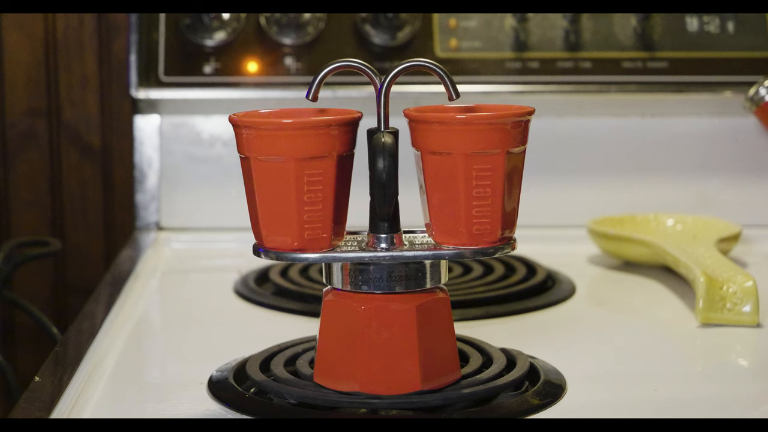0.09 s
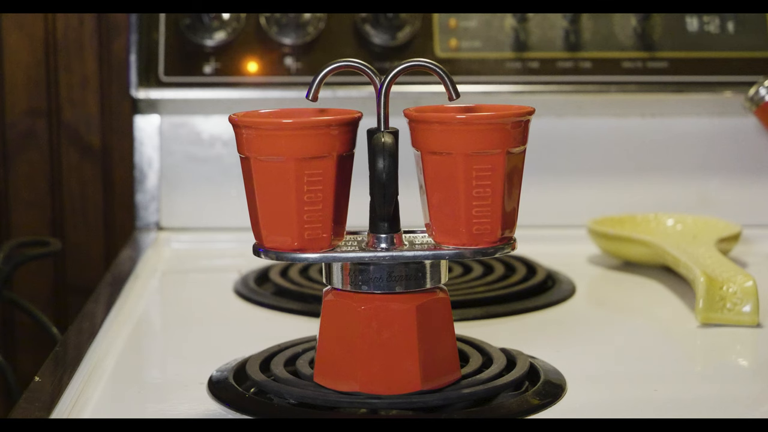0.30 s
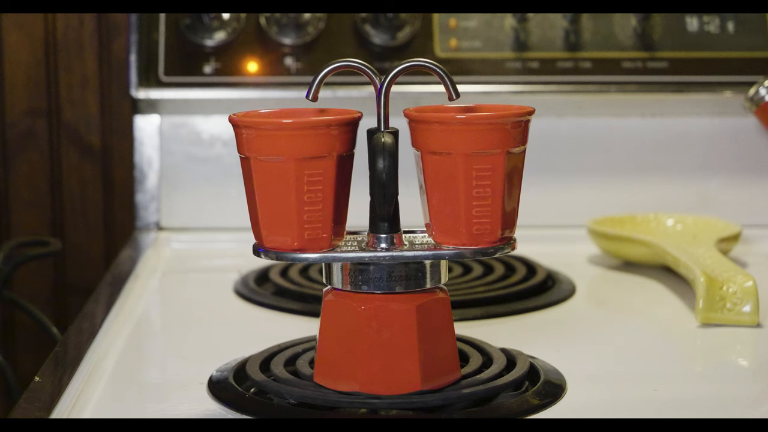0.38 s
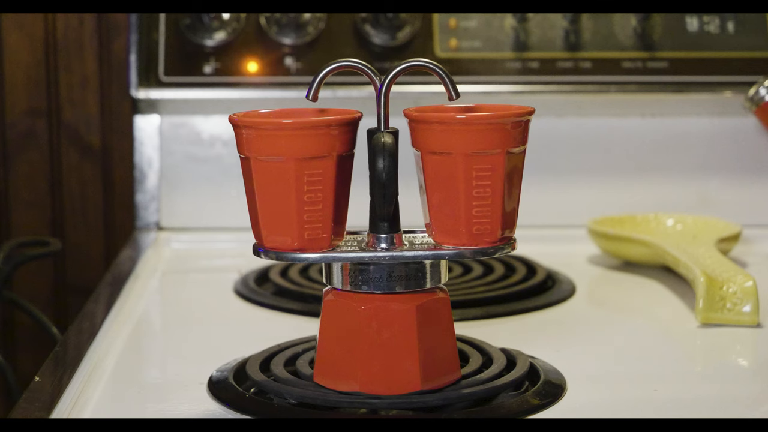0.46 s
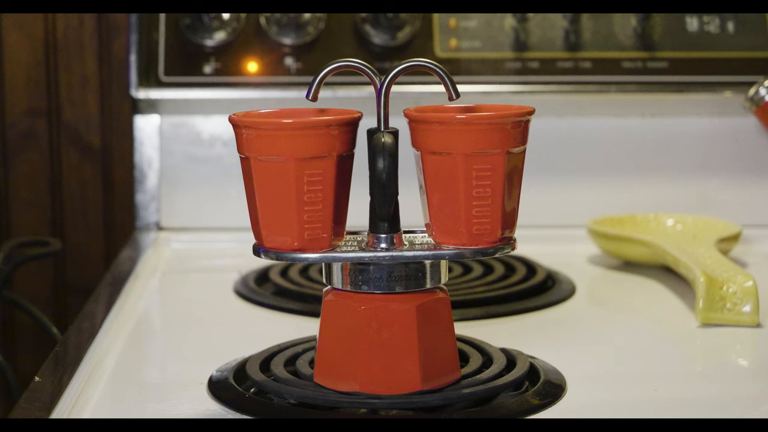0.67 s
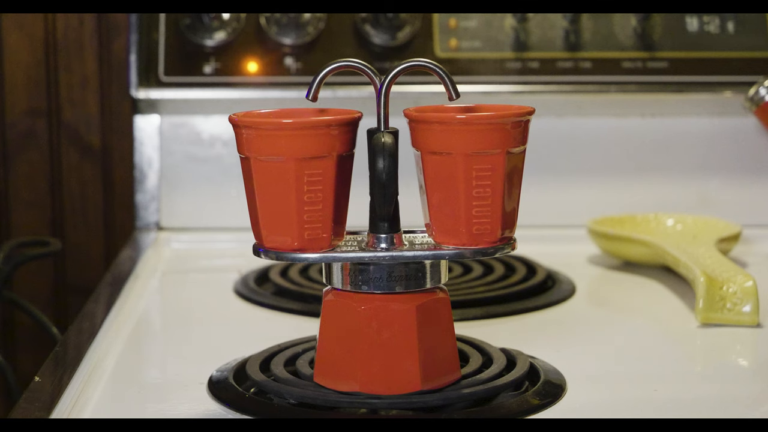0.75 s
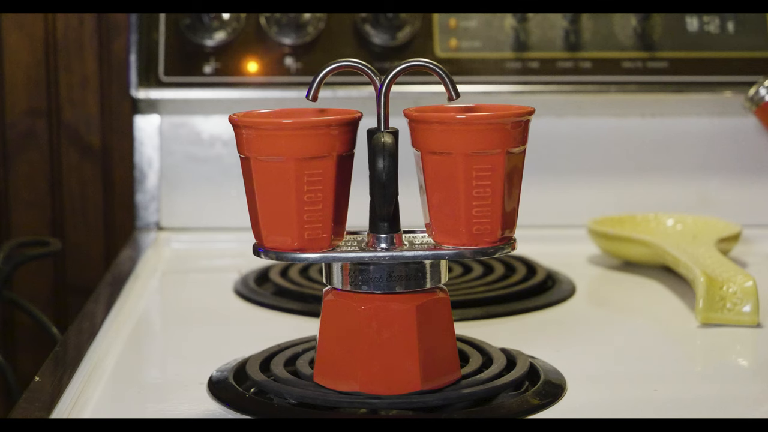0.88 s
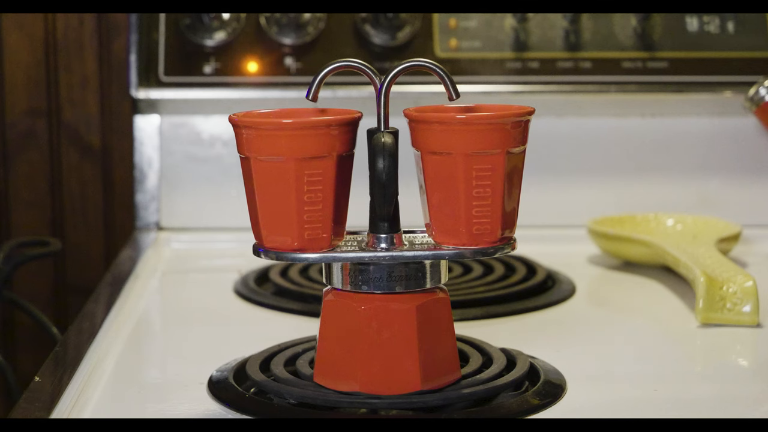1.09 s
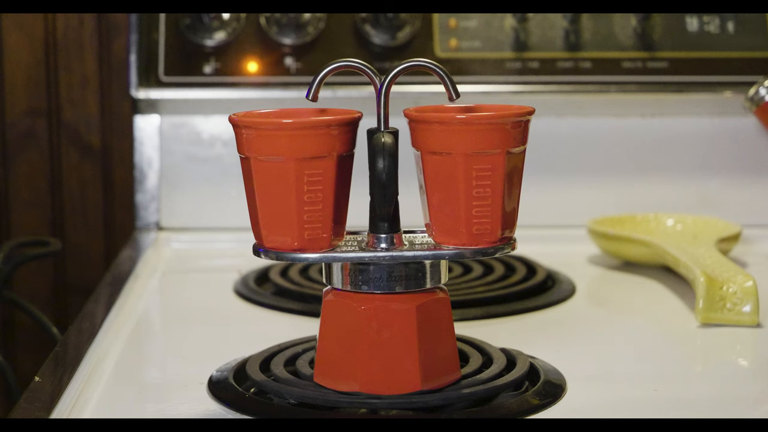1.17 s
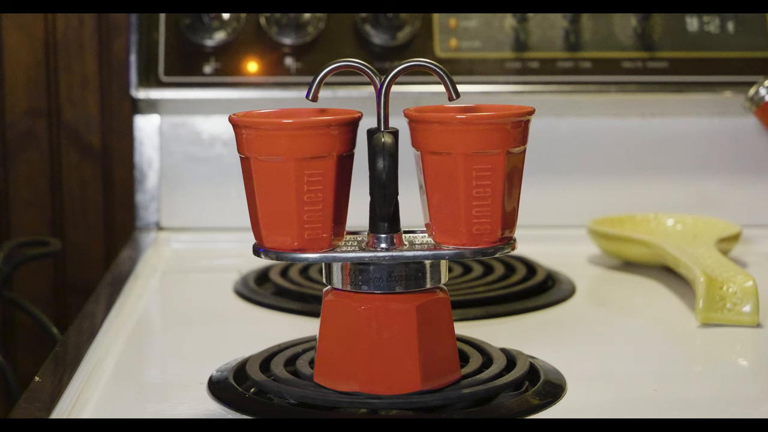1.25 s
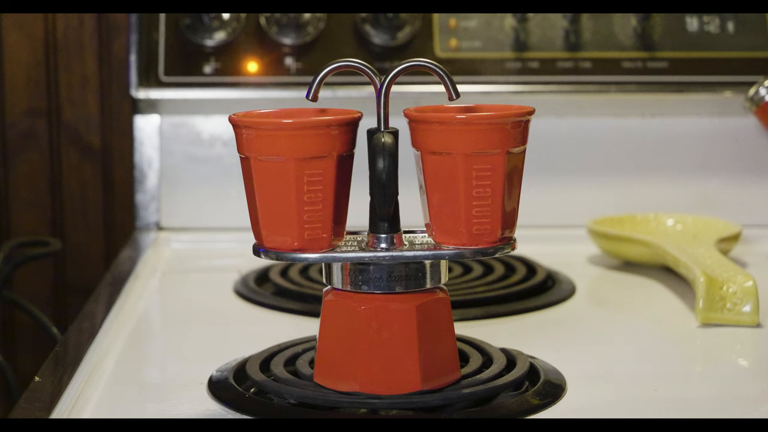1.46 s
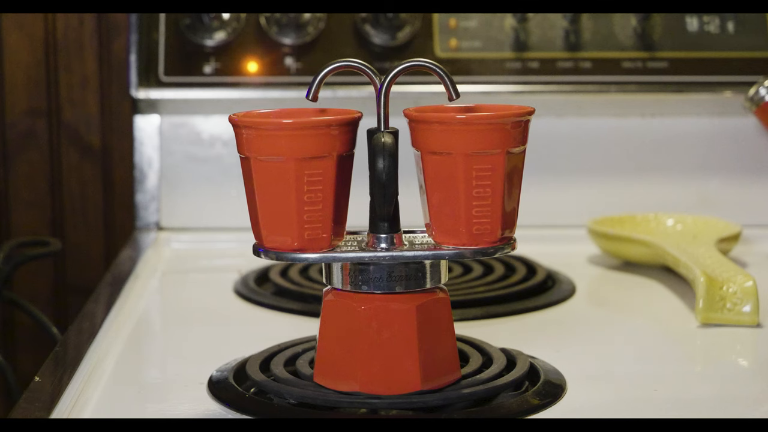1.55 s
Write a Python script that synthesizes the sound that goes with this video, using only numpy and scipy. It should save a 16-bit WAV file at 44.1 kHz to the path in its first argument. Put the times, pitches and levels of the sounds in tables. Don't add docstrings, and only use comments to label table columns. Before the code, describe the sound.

Coffee spits from thin metal spouts into cups, heard very close with a short, tight cup and kitchen echo; irregular bubbly pops build to fierce, slightly overloaded crackling, then thin out over faint hiss and hum.

```python
import sys
import numpy as np
from scipy import signal
from scipy.fft import rfft, irfft
from scipy.io import wavfile
from scipy.ndimage import uniform_filter1d

SR = 44100
rng = np.random.default_rng(int(sys.argv[2]) if len(sys.argv) > 2 else 0)


def rack_gain(trim_db):
    fader = np.asarray(trim_db, float)
    return 10 ** (fader / 20)


def file_out(sig):
    cols = np.atleast_2d(sig).T
    lim = np.clip(cols, -1, 1)
    pcm = np.round(lim * 32767).astype(np.int16)
    wavfile.write(sys.argv[1], SR, pcm)


N = 68355
# (frequency [Hz], width [Hz], level [dB])
SPOUT = [(1046, 443, 11), (2250, 1550, 2.5), (4727, 1200, -11.5), (6080, 2630, -9), (10705, 3200, -24)]
COLOUR_DB = 4
CROWD_PER_S = 1600
AFTER_S, AFTER_DB = 0.003, -6.5


def evened(x):
    return x / np.sqrt(np.mean(x ** 2) + 1e-20)


def add(mix, s, sound):
    part = mix[max(round(s * SR), 0):][:len(sound)]
    part += sound[:len(part)]


def resonate(x, hz, width):
    pole = np.exp((2j * hz - width) * np.pi / SR)
    return 2 * signal.lfilter([1 - abs(pole)], [1, -pole], x).real


def ring(hz, cycles, phase):
    u = np.arange(1500) / SR * hz / cycles
    swell = (u * np.exp(1 - u)) ** 1.6
    return swell * np.cos(2 * np.pi * ((u - 1) * cycles + 0.12 * phase))


def hiss():
    # (frequency [Hz], level [dB per Hz])
    air_colour = [(40, -14), (100, 5), (276, 7), (640, -2.5), (2600, -55), (4000, -16), (12300, -24.5),
                  (16500, -25)]
    hiss_db, patch_db, flicker_db = -51, 3.5, 2.5
    a, b, patches = rng.standard_normal((N // 64 + 5, 129, 3)).T
    patches = evened(uniform_filter1d(uniform_filter1d(patches, 14, 0), 8, 1))
    flicker = evened(patches[30:].mean(0))
    level = patch_db * np.clip(patches, -2, 2) + flicker_db * flicker
    x = signal.istft((a + 1j * b) * rack_gain(level), nperseg=256, noverlap=192)[1][:N]
    f, db = np.transpose(air_colour)
    hz = np.fft.rfftfreq(N, 1 / SR)
    colour = rack_gain(np.interp(np.log(hz + 1), np.log(f + 1), db))
    return rack_gain(hiss_db) * evened(irfft(rfft(x) * colour, N))


def hum():
    return rack_gain(-58.5) * np.sin(2 * np.pi * 61 * np.arange(N) / SR)


def through_spout(clicks, colour):
    out = np.zeros(N)
    for k, (hz, width, db) in enumerate(SPOUT):
        once = resonate(clicks * colour[k], hz, 1.35 * width)
        out += (-1) ** k * rack_gain(db) * resonate(once, hz, 1.34 * width)
    return out


def crackle():
    # (start [s], length [s], level [dB])
    surge_times = [
        (0.593, 0.059, -36),
        (0.721, 0.023, -33),
        (0.792, 0.039, -34.5),
        (0.845, 0.022, -30.5),
        (0.894, 0.045, -26),
        (0.951, 0.022, -25),
        (1.036, 0.066, -28),
        (1.103, 0.056, -33),
        (1.248, 0.061, -39.5),
    ]
    edge_s, thinning, surge_spread_db = .004, .6, 3.0
    stray_per_s, stray_db, stray_spread_db = 300, -57, 3.5
    t, level = np.arange(N) / SR, np.zeros(N)
    for s, length, db in surge_times:
        shape = np.minimum((t - s) * 3, s + length - t) / edge_s
        level += rack_gain(db) * np.clip(shape, 0, 1)
    share = (level / level.max() + 1e-9) ** thinning
    draw = rng.random(N)
    size = np.minimum(rng.exponential(1, N), 3)
    sign = rng.choice([-1., 1.], N)
    dense = sign * rack_gain(surge_spread_db * size)
    stray = sign * rack_gain(stray_spread_db * size) * (draw > 1 - stray_per_s / SR)
    colour = rack_gain(COLOUR_DB * np.clip(rng.standard_normal((N, len(SPOUT))).T, -2, 2))
    crowd = dense * (draw < share * CROWD_PER_S / SR) * level / np.sqrt(share)
    full_crowd = dense * (draw < CROWD_PER_S / SR)
    surges = through_spout(crowd, colour) / np.std(through_spout(full_crowd, colour))
    return surges + rack_gain(stray_db) * evened(through_spout(stray, colour))


def pops():
    # (time [s], peak level [dB], spout ring [Hz])
    single_pops = [(0.0048, -24.5, 2540), (0.0118, -22.0, 2010), (0.028, -25, 2370), (0.0444, -27.5, 2540),
                   (0.0517, -39, 2430), (0.0629, -34, 2440), (0.1015, -21, 2530), (0.1651, -26, 2540),
                   (0.1827, -23.5, 2540), (0.2007, -11.5, 2420), (0.2456, -18.0, 2570),
                   (0.2916, -29.5, 2190), (0.3337, -35.5, 2570), (0.3509, -39, 2570), (0.4224, -12.0, 2320),
                   (0.442, -20.5, 2490), (0.4904, -37, 2200), (0.5021, -28.0, 2070), (0.5101, -21, 2097),
                   (0.5205, -42, 2250), (0.5237, -19, 2340), (0.5456, -30.0, 2000), (0.5673, -26, 2040),
                   (0.586, -21, 2140), (0.5986, -17, 2120), (0.6051, -20, 2150), (0.6171, -25, 2160),
                   (0.625, -18.5, 2500), (0.6368, -22, 2700), (0.6398, -19, 1960), (0.6507, -19.5, 2220),
                   (0.6745, -19.5, 2500), (0.6795, -19.5, 2630), (0.7215, -23, 2170), (0.7299, -12.5, 2450),
                   (0.7333, -17, 2240), (0.7414, -13, 2170), (0.7937, -24, 2130), (0.7967, -22.5, 2290),
                   (0.8018, -17.5, 2160), (0.8056, -14.5, 2470), (0.8087, -11, 2350), (0.8129, -18, 2200),
                   (0.8399, -22, 2410), (0.8493, -5.5, 2310), (0.8542, -8, 2580), (0.8579, -22, 2230),
                   (0.8621, -21, 2550), (0.8733, -15, 2370), (0.8836, -12.5, 2240), (0.8893, -17, 1850),
                   (0.8966, -22, 2250), (0.9016, -22.5, 2320), (0.9085, -1, 2220), (0.9164, -11, 2230),
                 (0.923, -15, 2430), (0.9278, -17, 2400), (0.9318, -15.5, 2380), (0.9386, -11, 2380),
                 (0.9537, -12, 2200), (0.9591, -10.5, 2220), (0.9647, -16.5, 2200), (0.9662, -12, 2450),
                 (0.982, -9.5, 2260), (1.0044, -10.5, 2270), (1.009, -15, 2250), (1.0326, -17.5, 2150),
                 (1.0403, -21, 2240), (1.0479, -13, 2160), (1.053, -17, 2220), (1.0559, -9, 2160),
                 (1.068, -9.5, 2270), (1.074, -13, 2270), (1.078, -7.5, 2220), (1.0817, -6.5, 2370),
                 (1.086, -14, 1880), (1.092, -15.5, 2090), (1.1056, -24, 2370), (1.109, -15.5, 2270),
                 (1.1193, -18.5, 2080), (1.1288, -24, 2370), (1.1412, -13.5, 2260), (1.1486, -12, 2300),
                 (1.1516, -17.5, 2220), (1.1715, -22, 2440), (1.2119, -27, 2120), (1.2241, -20, 1900),
                 (1.2419, -18, 2470), (1.2572, -20.0, 1940), (1.2669, -19.5, 2150), (1.2767, -18.5, 2500),
                 (1.3055, -36, 2190), (1.319, -28.5, 2060), (1.3574, -34, 2170), (1.3693, -23.5, 2420),
                 (1.3933, -27.5, 1820), (1.4093, -19.0, 2140), (1.4319, -30, 1940), (1.4966, -20.5, 2340),
                 (1.5141, -27, 2440), (1.5172, -23, 2270), (1.5466, -28, 2010),
                   (0.0972, -27, 2500),
        (0.1878, -26, 1870),
    ]
    cycles = 1.15
    rows, out = single_pops, np.zeros(N)
    for (s, db, hz), (a, b, c, d) in zip(rows, rng.random((len(rows), 4))):
        add(out, s - cycles / hz, rack_gain(db) * ring(hz, cycles, 2 * a - 1))
        after = ring(hz * 2 ** (b - .5), cycles, b)
        add(out, s + AFTER_S * (.5 + d), rack_gain(db + AFTER_DB - 10 * c) * after)
    return out


def ticks():
    # (time [s], peak level [dB])
    sharp_ticks = [(0.0116, -18.5), (0.0276, -20.5), (0.0628, -37), (0.1014, -20), (0.1651, -29.5),
                   (0.2007, -14), (0.2033, -22.5), (0.2454, -29.5), (0.2916, -33), (0.3337, -31),
                   (0.3976, -28), (0.4056, -26), (0.4224, -14.5), (0.5021, -23.0), (0.5099, -25),
                   (0.5203, -15.5), (0.5236, -17.5), (0.5454, -19.5), (0.5857, -20.5), (0.5985, -12.5),
                   (0.6048, -30), (0.6249, -27.0), (0.6305, -20), (0.6361, -28), (0.6397, -18.5),
                   (0.6615, -26), (0.6745, -27), (0.6794, -27.5), (0.7295, -8.5), (0.7329, -13),
                   (0.7412, -12), (0.7932, -21), (0.7967, -17), (0.8016, -19), (0.8073, -23), (0.8124, -15),
                   (0.8398, -24), (0.8498, -23), (0.8542, -14.5), (0.8577, -24), (0.8834, -23),
                   (0.8894, -20.5), (0.896, -15.5),
                   (0.8995, -24), (0.907, -15.5), (0.91, -26), (0.9151, -13), (0.928, -36), (0.9385, -23),
                  (0.9564, -13.5), (0.9593, -17), (0.963, -20), (0.981, -22), (0.9982, -16),
                  (1.0037, -16.5), (1.0403, -25), (1.0556, -8.5), (1.0656, -25), (1.074, -18.5),
                  (1.0804, -22.0), (1.0907, -18.5), (1.0937, -23), (1.1087, -12.5), (1.1194, -19),
                  (1.1414, -15.5), (1.1486, -11), (1.1714, -29), (1.212, -26.0), (1.2247, -22.0),
                  (1.2417, -25), (1.259, -22), (1.266, -20.5), (1.27, -24.5), (1.288, -25), (1.306, -27.5),
                  (1.3185, -27.5), (1.3692, -34), (1.3937, -25), (1.4037, -23.5), (1.4097, -24),
                  (1.4306, -26.5), (1.4549, -26.5), (1.495, -20.5), (1.5129, -28), (1.5167, -21),
                  (1.5464, -24.5)]
    rows, out = sharp_ticks, np.zeros(N)
    chance = np.clip(rng.standard_normal((len(rows), 2, 3, 3)), -1, 1)
    for (s, db), pair in zip(rows, chance):
        for k, luck in enumerate(pair):
            x = 0
            for (hz, width, ring_db), (a, b, c) in zip(SPOUT[2:], luck):
                cycles = 1.9 * hz / 2 / width / np.pi
                x = x + rack_gain(ring_db + COLOUR_DB * a) * ring(hz * (1 + 0.036 * b), cycles, c)
            peak_s = abs(x).argmax() / SR
            lag_s = k * AFTER_S / 2 * abs(luck[0, 2])
            add(out, s - peak_s + lag_s, rack_gain(db + k * AFTER_DB) * x / abs(x).max())
    return out


def two_beats(rows, turns):
    out = np.zeros(N)
    for (s, db, hz), (a, b, c) in zip(rows, rng.uniform(-0.866, 1, (len(rows), 3))):
        start = s - turns / hz
        add(out, start, rack_gain(db) * ring(hz, turns, a))
        lag_s = AFTER_S * np.sign(b) * (1 - abs(b) / 2)
        add(out, start + lag_s, rack_gain(db + AFTER_DB / 2) * ring(hz * 2 ** (c / 2), turns, c))
    return out


def thumps():
    # (time [s], peak level [dB], pitch [Hz])
    cup_thumps = [(0.0652, -26, 1014), (0.1321, -28.5, 890), (0.2008, -25, 1160), (0.4228, -20.5, 1100),
                  (0.4921, -24.5, 895), (0.5235, -24, 1190), (0.5669, -29, 980), (0.5987, -27.5, 990),
                  (0.6251, -29, 1150), (0.6359, -27, 1110), (0.726, -29, 950), (0.73, -42, 1040),
                  (0.7416, -27.5, 1070), (0.8056, -29, 1100), (0.8105, -22, 1090), (0.8303, -24, 1040),
                  (0.8526, -29, 1060), (0.896, -20, 1040), (0.9078, -18, 1090), (0.9156, -19.5, 1130),
                  (0.9388, -21.5, 1090), (0.9523, -22, 990), (0.9568, -16, 1030), (0.9613, -20, 1100),
                  (0.9777, -18.5, 1120), (1.0086, -21, 1030), (1.0406, -28, 1060), (1.0584, -25, 1030),
                  (1.0773, -24.5, 1140), (1.0905, -16.5, 1020), (1.1249, -18, 1030), (1.1324, -20, 940),
                  (1.1492, -22, 1120), (1.2424, -22, 1080), (1.2774, -19.5, 1030), (1.3937, -21.5, 1220),
                  (1.4325, -29.5, 1000), (1.5078, -25.5, 865)]
    return two_beats(cup_thumps, 0.5)


def gulps():
    # (time [s], peak level [dB], pitch [Hz])
    liquid_gulps = [(0.0658, -40, 308), (0.0875, -42.5, 366), (0.1181, -39, 297), (0.2509, -39.5, 370),
                    (0.4049, -39, 327), (0.4668, -37.5, 326), (0.5537, -40.5, 344), (0.5692, -35.5, 267),
                    (0.5901, -38.5, 313), (0.6929, -31.5, 346), (0.813, -38, 410), (0.8317, -33, 380),
                    (0.8702, -36.5, 382), (0.9077, -35, 550), (0.9523, -52, 503), (1.1227, -32, 494),
                    (1.1347, -28.5, 467), (1.2767, -25, 404)]
    return two_beats(liquid_gulps, 1.0)


def steam_puffs():
    # (time [s], level [dB])
    puff_times = [
        (0.137, -48),
        (1.453, -42),
    ]
    length_s, steam_hz = 0.0085, 12800
    t, swell = np.arange(N) / SR, np.zeros(N)
    for s, db in puff_times:
        swell += rack_gain(db) * np.exp(-((t - s) / length_s) ** 2)
    clicks = rng.standard_normal(N) * (rng.random(N) < CROWD_PER_S / SR)
    return swell * evened(resonate(resonate(clicks, steam_hz, 3000), steam_hz, 3800))


def small_bubbles():
    # (time [s], peak level [dB], pitch [Hz])
    bubble_rings = [
        (.3165, -32.5, 570),
        (.319, -27, 880),
        (1.46, -32, 950),
        (1.2871, -27, 670),
        (1.2965, -27.5, 930),
    ]
    return two_beats(bubble_rings, 0.5)


def echoes(x, t60, delay_s):
    taps = np.zeros(SR // 3)
    at = np.arange(0, len(taps) - 20, 20) + rng.integers(0, 20, (len(taps) - 1) // 20)
    taps[at] = rng.choice([-1., 1.], len(at)) * rack_gain(-60 * at / SR / t60)
    taps = np.r_[np.zeros(round(delay_s * SR)), taps / np.linalg.norm(taps)]
    return signal.fftconvolve(x, taps)[:N]


def scene():
    pot = crackle() + pops() + ticks() + thumps() + gulps() + small_bubbles()
    cups = rack_gain(-16) * echoes(pot, 0.09, 0.000982)
    room = rack_gain(-18.5) * echoes(pot, 0.16, .004)
    return (pot + cups + room + hiss() + hum() + steam_puffs())[None]


def roll_off(x):
    return signal.sosfilt(signal.butter(12, 16990, fs=SR, output="sos"), x)


def record(dry):
    limit = .5
    soft = limit * np.tanh(dry / limit)
    low_cut = signal.butter(4, 81, "high", fs=SR, output="sos")
    band_limit = signal.firwin(255, 16050, window=("kaiser", 5), fs=SR)
    mix = signal.oaconvolve(signal.sosfilt(low_cut, soft), band_limit[None], "same")
    return roll_off(mix)


dry = scene()
out = record(dry)
file_out(out)
```